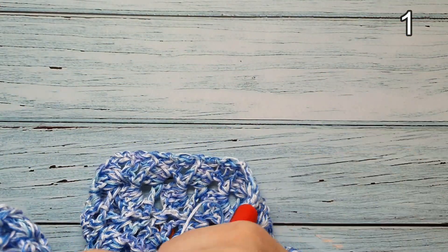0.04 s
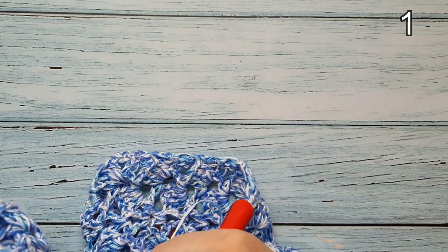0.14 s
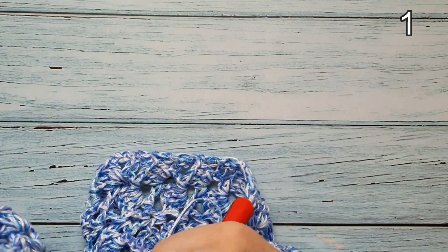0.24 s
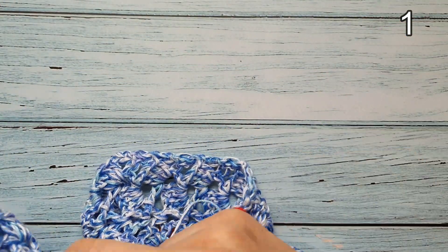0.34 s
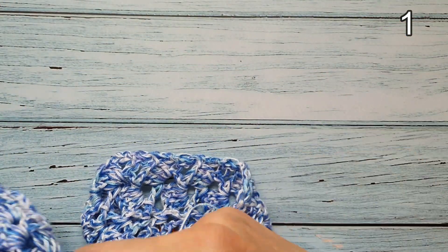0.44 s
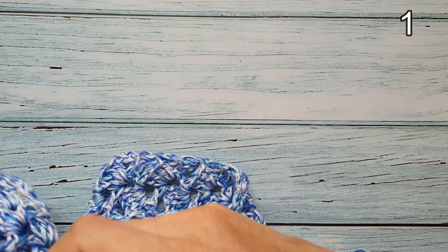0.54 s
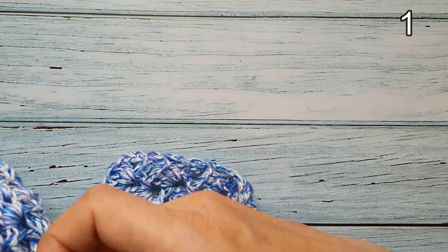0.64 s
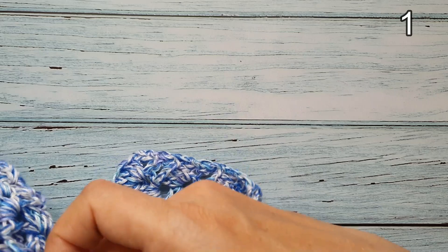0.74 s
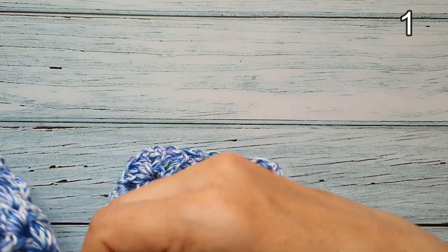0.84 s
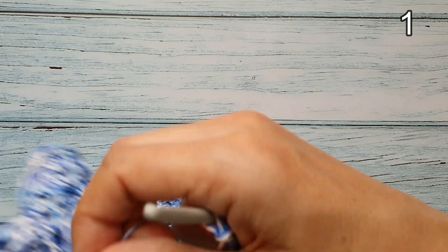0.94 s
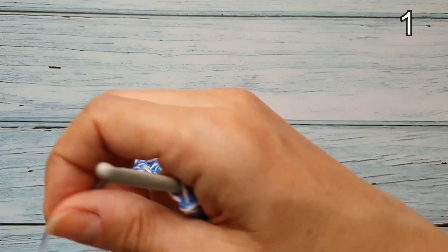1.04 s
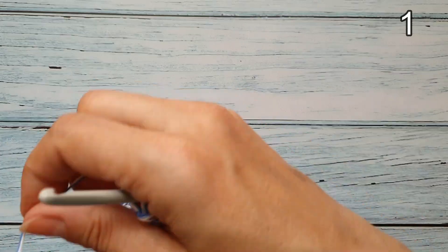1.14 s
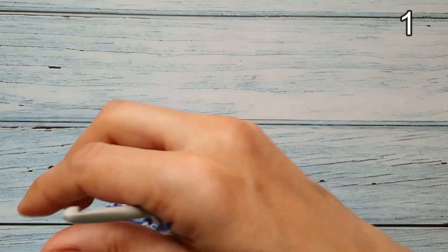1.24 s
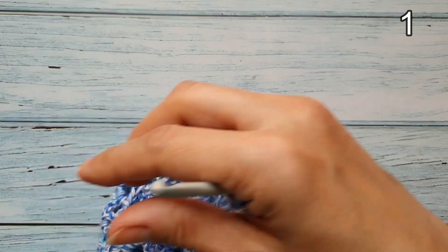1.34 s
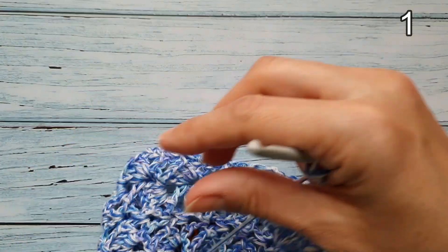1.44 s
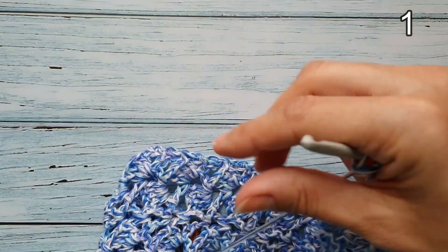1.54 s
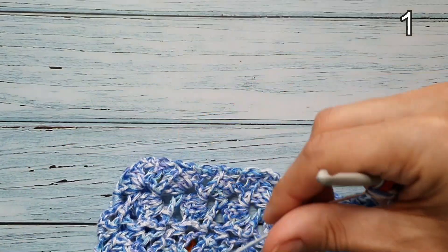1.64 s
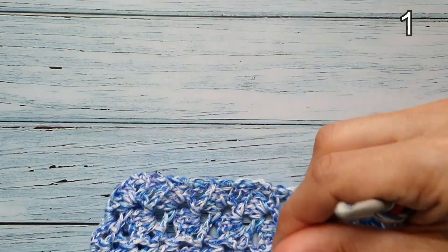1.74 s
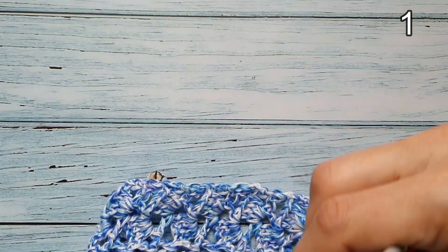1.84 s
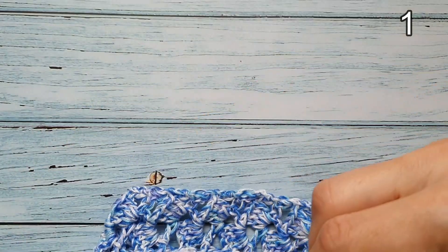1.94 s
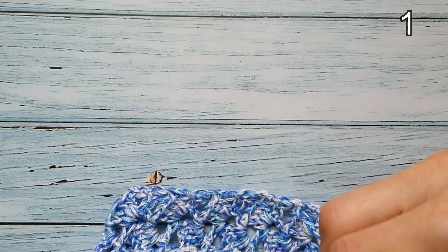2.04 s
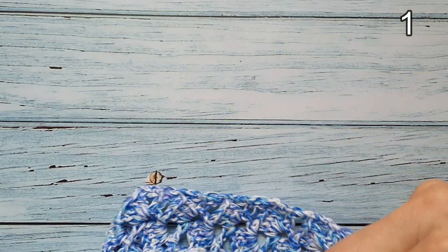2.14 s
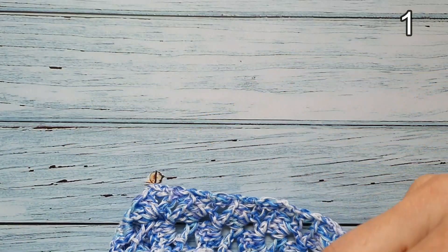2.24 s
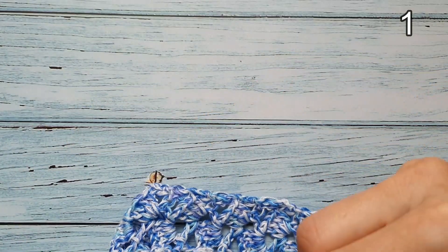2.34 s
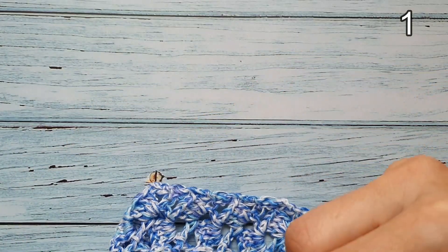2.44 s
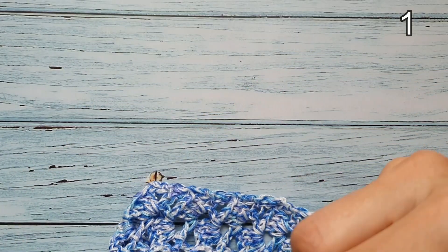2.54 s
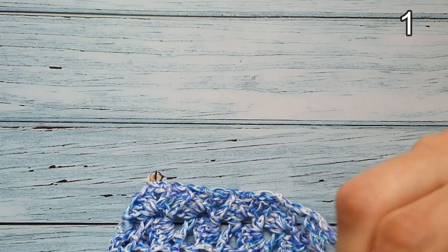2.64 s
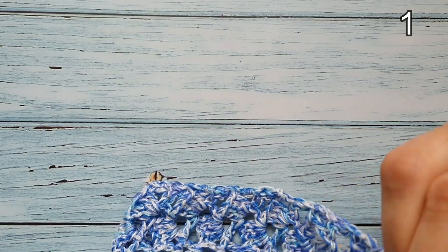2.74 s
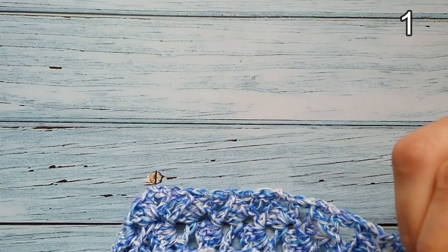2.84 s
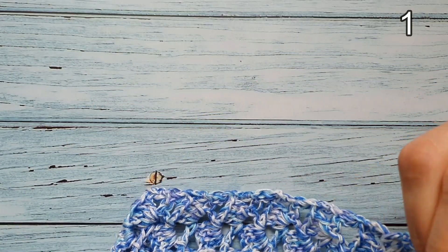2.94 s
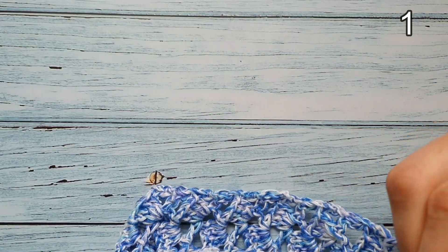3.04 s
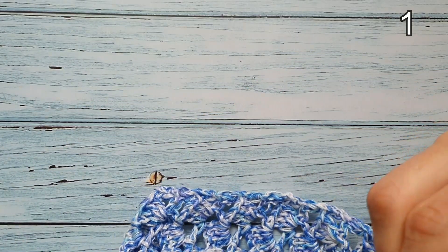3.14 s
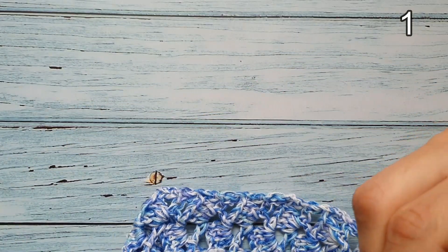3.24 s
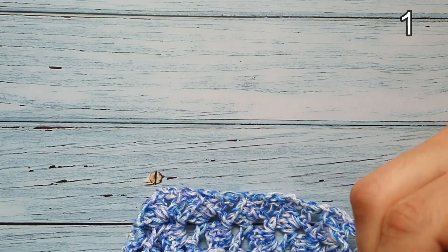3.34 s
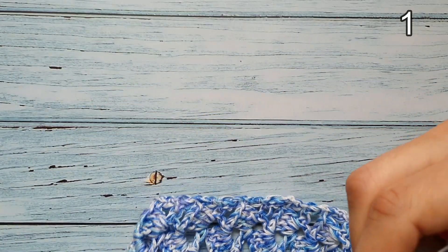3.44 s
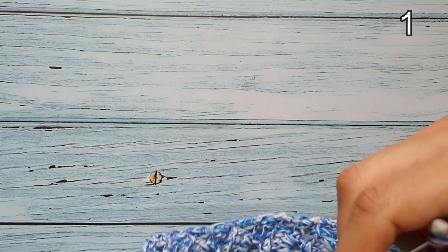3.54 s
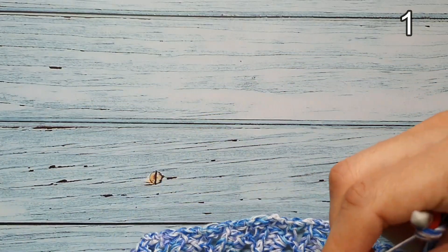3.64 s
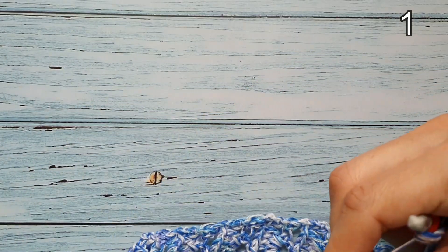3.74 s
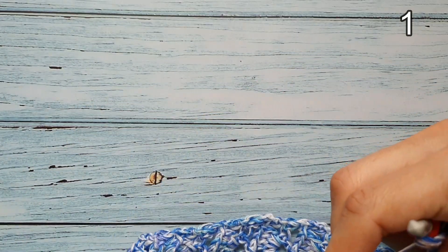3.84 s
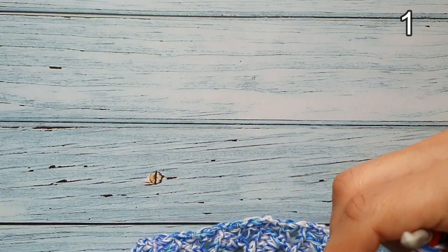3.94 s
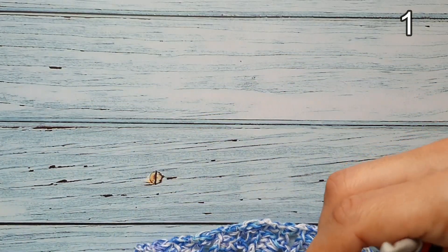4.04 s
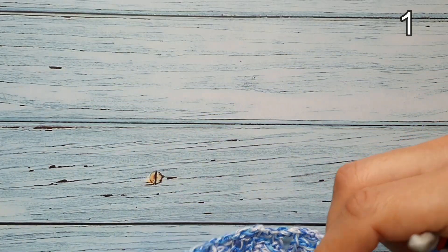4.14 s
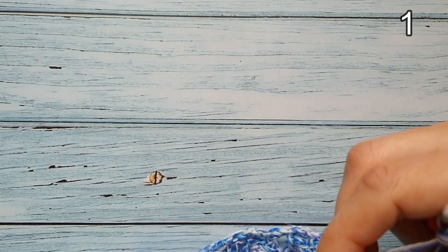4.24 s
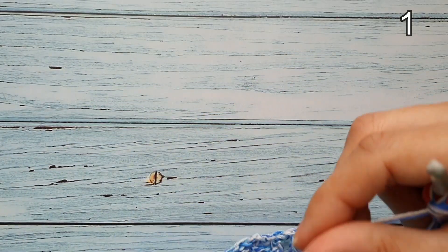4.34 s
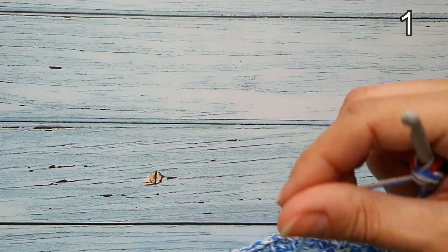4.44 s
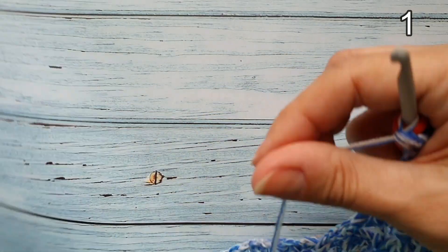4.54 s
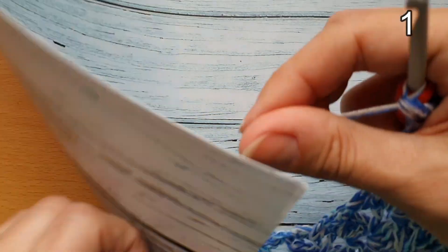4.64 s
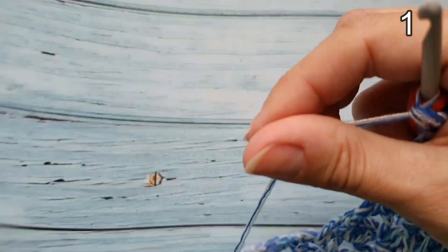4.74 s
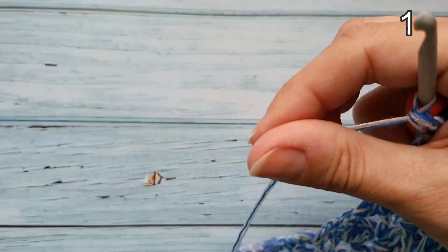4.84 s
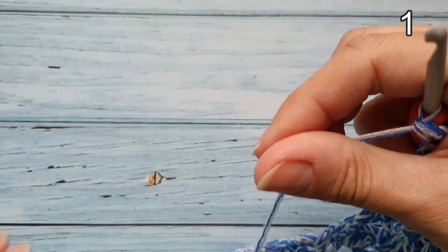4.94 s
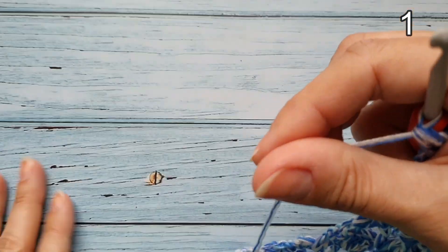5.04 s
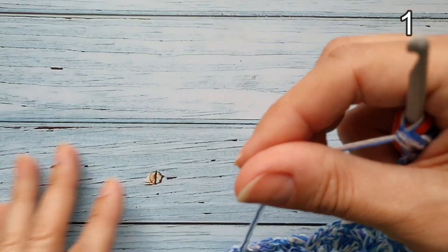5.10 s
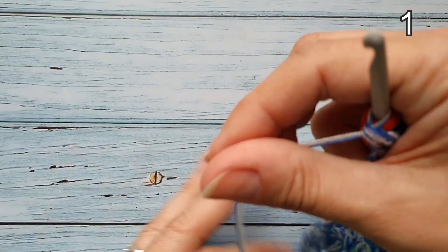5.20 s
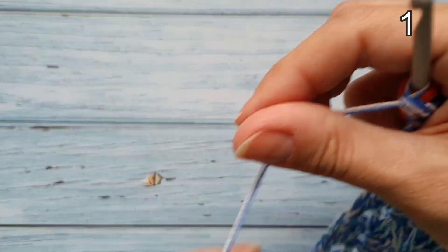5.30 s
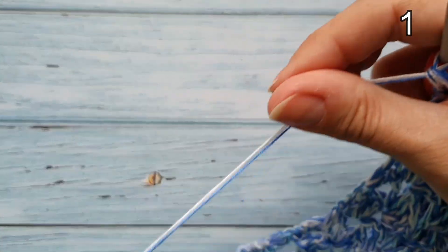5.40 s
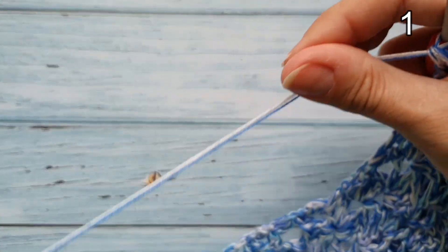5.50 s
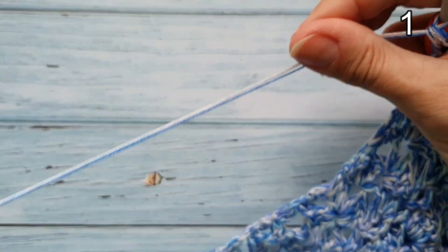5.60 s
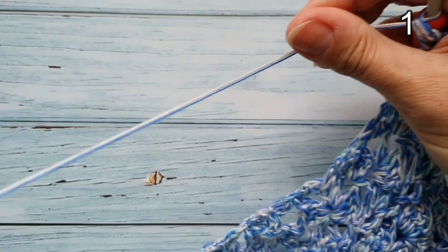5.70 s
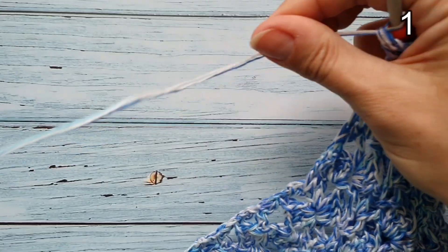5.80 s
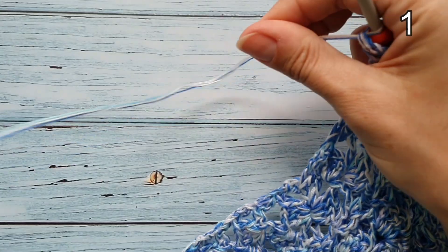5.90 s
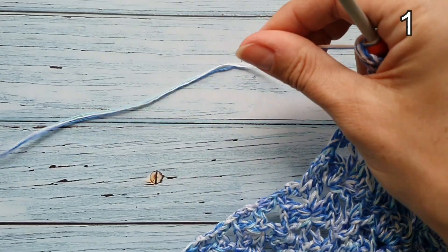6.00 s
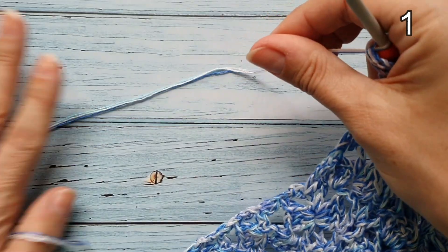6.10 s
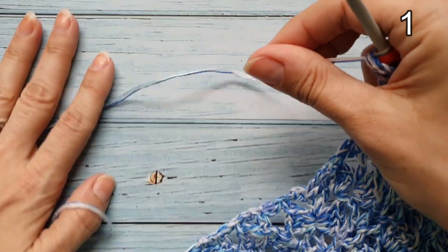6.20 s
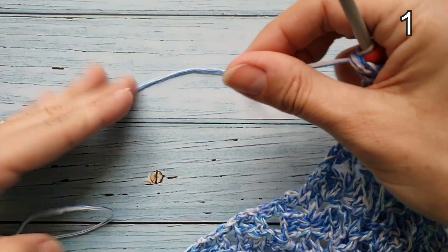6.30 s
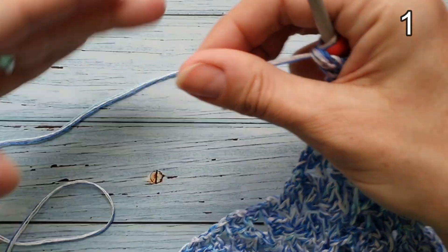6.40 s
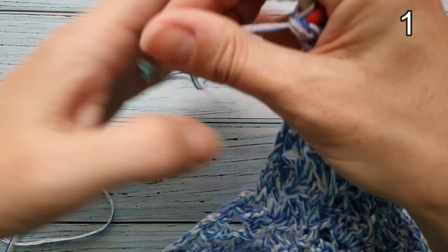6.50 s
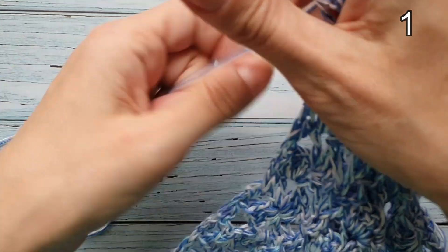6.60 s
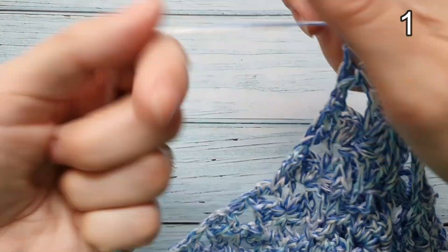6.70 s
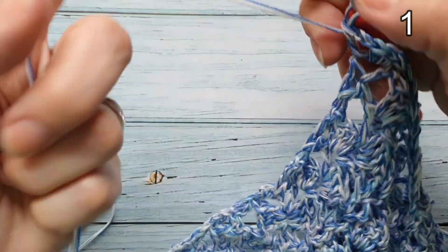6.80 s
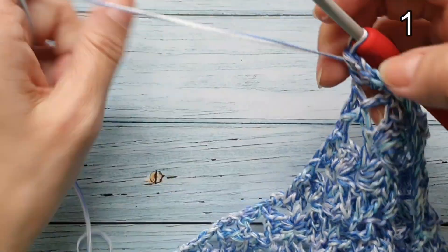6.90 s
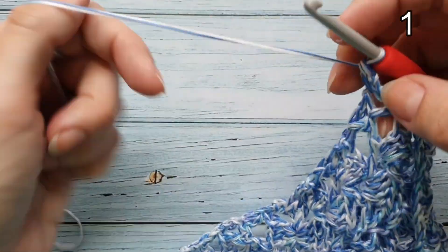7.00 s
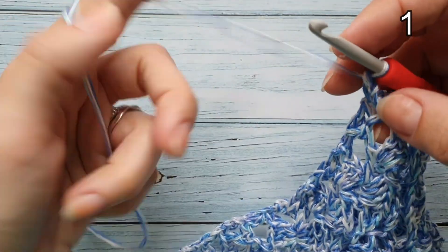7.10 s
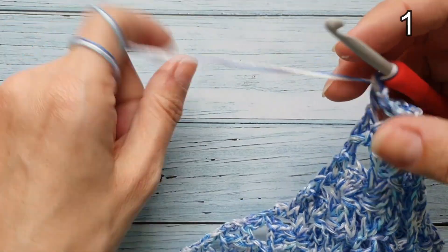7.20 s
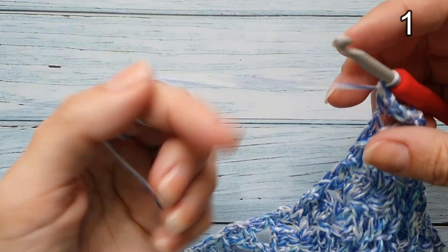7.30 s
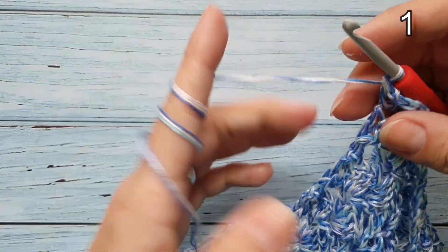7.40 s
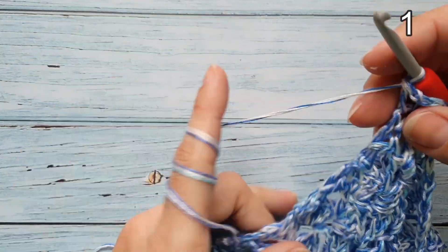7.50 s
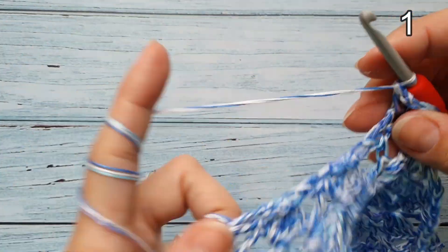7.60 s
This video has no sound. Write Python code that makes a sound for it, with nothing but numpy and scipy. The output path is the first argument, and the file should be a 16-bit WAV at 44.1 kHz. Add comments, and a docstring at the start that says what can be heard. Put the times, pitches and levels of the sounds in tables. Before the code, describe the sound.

Hands handle crochet on a wooden board, heard close in a quiet room with a faint low rumble. The first second holds only a slight rustle and a couple of tiny ticks. From about 1.4 to 2.2 seconds the cloth rubs softly over the wood, with light taps and dull thuds. After a lull, the rubbing and tapping return around 3 seconds and grow busier from 4.6. At 5 seconds comes a hollow clunk with a small bright clink, then a cluster of ticks and a low thump at 5.3. Yarn is drawn out with a faint hiss from 5.4 to 6.3 seconds. At 6.4 one sharp knock on the board, by far the loudest sound, rings briefly and leaves a faint after-ring. From 6.8 to 7.6 seconds yarn is wound round a finger in about five soft swishes, ending with a tiny tap.

```python
"""Soft rubbing and light taps are heard first: hands shift crochet over a wooden board in a quiet room.
Stick-slip friction of cotton and skin makes the rustle; fingers and hook excite the wood by impact.
Something small clinks, yarn hisses as it is drawn out, and one sharp knock, the loudest sound, sets
the board's modes ringing and leaves a faint after-ring. Last, yarn is wound round a finger."""
import sys
import numpy as np
from scipy import signal
from scipy.fft import rfft, irfft
from scipy.io import wavfile
from scipy.ndimage import uniform_filter1d

SR = 44100
rng = np.random.default_rng(int(sys.argv[2]) if len(sys.argv) > 2 else 0)


def output_pcm(signal):
    """Save a mono or channel-first signal as 16-bit PCM at the path in sys.argv[1].

    Samples are clipped to [-1, 1] before scaling.
    """
    pcm = np.clip(np.atleast_2d(signal).T, -1, 1) * 32767
    wavfile.write(sys.argv[1], SR, np.round(pcm).astype(np.int16))


N = 337629
TIME = np.arange(N) / SR
AGE = TIME[:SR]  # seconds since a blow

def undb(db):
    """Decibels are logarithmic: 20 dB is a tenfold amplitude."""
    return 10 ** (np.asarray(db) / 20)

def unit(x, span_s=None):
    """Normalisation to rms 1, over the whole signal or its first span_s."""
    return x / np.sqrt(np.mean((x if span_s is None else x[:int(span_s * SR)]) ** 2))

def add(out, start_s, x):
    """Superposition: a sound adds to the mix from start_s on."""
    i = int(start_s * SR)
    out[i:i + len(x)] += x[:N - i]

def fade(t60_s):
    """Damping: exponential decay by 60 dB in t60_s."""
    return np.exp(-np.log(1000) * AGE / t60_s)

def colour(x, spectrum):
    """Minimum-phase filtering through (frequency_hz, gain_db) points, by folding the cepstrum."""
    size = 4096
    hz, db = np.transpose(spectrum)
    bins_hz = np.maximum(np.arange(size // 2 + 1), .5) * SR / size
    gain = undb(np.interp(np.log(bins_hz), np.log(hz), db))
    cepstrum = irfft(np.log(gain))
    cepstrum[1:size // 2] *= 2
    cepstrum[size // 2 + 1:] = 0
    impulse_response = irfft(np.exp(rfft(cepstrum)))
    return signal.fftconvolve(x, impulse_response)[:len(x)]

def band(x, hz, ratio, order=2):
    """Band-pass filtering from hz / ratio to hz * ratio."""
    ratio = max(ratio, 1.05)
    edges_hz = [hz / ratio, min(hz * ratio, .45 * SR)]
    return signal.sosfilt(signal.butter(order, edges_hz, "band", fs=SR, output="sos"), x)

def walk(rate_hz):
    """Random modulation: a smooth wander of rms 1."""
    hold = int(SR / rate_hz)
    steps = np.repeat(rng.standard_normal(N // hold + 1), hold)
    return unit(uniform_filter1d(steps, hold)[:N])

def stroke(time, start_s, length_s, rise_s):
    """Speed envelope of a hand: it builds, sags and dies away; a gentle start gives a gentle end."""
    age = np.maximum(time - start_s, 0)
    build = np.sin(np.pi / 2 * np.minimum(age / rise_s, 1)) ** 2
    sag = undb(-2.5 * np.minimum(age / length_s, 1))
    release_s = .015 + .37 * rise_s
    return build * sag * np.exp(-np.maximum(age - length_s, 0) / release_s)

def gains(strokes):
    """Incoherent summation: overlapping strokes add in power, giving one gain curve per level column."""
    time = TIME[::40]
    speeds = np.array([stroke(time, *row[:3]) for row in strokes])
    strengths = undb([row[3:] for row in strokes])
    return [np.interp(TIME, time, np.sqrt(power)) for power in strengths.T ** 2 @ speeds ** 2]

def ring(modes):
    """Free vibration: damped sinusoids, each starting from zero with either sign."""
    return sum(rng.choice([-1, 1]) * undb(db) * fade(t60_s) * np.sin(2 * np.pi * hz * AGE)
               for hz, db, t60_s in modes)

def blow(click, crack_t60_s, tail_db, tail_t60_s):
    """Impact excitation: a contact pulse, a short crack and a noise tail of many close modes."""
    x = rng.standard_normal(SR) * (fade(crack_t60_s) + undb(tail_db) * fade(tail_t60_s))
    x[0] += click
    return x

def fibres(rate_hz, spread_db, patchy_db):
    """Stick-slip: fibres catch and release in dense tiny clicks; stitches pass in uneven patches."""
    releases = rng.random(N) < rate_hz / SR
    slips = releases * rng.standard_normal(N) * undb(spread_db * rng.standard_normal(N))
    return slips * undb(patchy_db * walk(55))

# Spectrum of the room's steady noise: frequency_hz, gain_db
ROOM_SPECTRUM = [(15, -32), (25, -7.5), (53, -1), (144, -14.5), (178, -12), (204, -18.5), (340, -22.5),
                 (520, -29.5), (760, -28), (1140, -37), (1660, -36), (2120, -40), (2560, -41.5),
                 (5010, -37), (5580, -30.5), (15500, -39.5)]
def room(direct):
    """Reverberation: a small furnished room adds faint diffuse reflections to its rumble and hiss."""
    reflections = rng.standard_normal(SR) * fade(t60_s=.22) * (AGE > .004)
    reverb = signal.fftconvolve(direct, reflections / np.linalg.norm(reflections))[:N]
    ambience = unit(colour(rng.standard_normal(N), ROOM_SPECTRUM)) * undb(.69 * walk(4))
    return direct + undb(-11) * reverb + undb(-63) * ambience

# Light rubs of skin on the board: start_s, length_s, rise_s, level_db
HOLLOW_RUBS = [(2.2, 1.45, .9, -75), (4.0, .4, .1, -72), (5.9, .45, .2, -71), (7.0, .55, .12, -74)]
def hollow_rubs():
    """Forced resonance: gliding skin keeps the board's hollow tone faintly sounding."""
    return gains(HOLLOW_RUBS)[0] * unit(band(rng.standard_normal(N), hz=810, ratio=1.09))

def yarn_squeak():
    """Narrow-band friction: a slack strand slips with an uneven squeak that falls as it slows."""
    start_s, length_s, rise_s, level_db = 6.07, .22, .1, -71
    glide_hz = np.interp(TIME, [start_s, start_s + length_s], [3500, 2000])
    pitch_hz = glide_hz * (1 + .036 * walk(25))
    lowpass = signal.butter(2, 230, fs=SR, output="sos")  # its cutoff is the squeak's half width
    grain = signal.sosfilt(lowpass, rng.standard_normal(N)) * undb(3 * walk(50))
    squeak = unit(grain * np.sin(2 * np.pi * np.cumsum(pitch_hz) / SR))
    return gains([(start_s, length_s, rise_s, level_db)])[0] * squeak

# Spectrum of slipping cotton fibres: frequency_hz, gain_db
FIBRE_SPECTRUM = [(800, -18), (1700, -10), (2500, -6), (3300, -6.5), (5000, -0.5), (6700, 1.5),
                  (9000, -4.5), (12000, -13.5), (16000, -22.5)]
def fibre_hiss(rate_hz, spread_db, patchy_db):
    """Shot noise: thousands of tiny slips a second merge into a bright hiss."""
    return unit(colour(fibres(rate_hz, spread_db, patchy_db), FIBRE_SPECTRUM))

# Spectrum of rubbed wood and hands: frequency_hz, gain_db
RUSTLE_SPECTRUM = [(40, -6.5), (75, 9.5), (120, 6.5), (220, 2.5), (400, -1), (620, -3.5), (830, -1.5),
                   (1100, -12.5), (2000, -17), (5000, -37.5)]
def rustle(friction):
    """Forced vibration: a rubbed body responds mostly at low frequencies."""
    return unit(colour(friction, RUSTLE_SPECTRUM))

# Yarn pulled through the fingers: start_s, length_s, rise_s, hiss_db, rub_db
YARN_PULLS = [(5.34, 0.22, .08, -78, -62.5), (5.56, .36, .16, -64.5, -68.5), (5.97, 0.34, .25, -76, -60),
              (6.45, .16, .04, -77.5, -56.5), (6.6, .18, 0.062, -75, -61.5)]
# Yarn wound round a finger: start_s, length_s, rise_s, hiss_db, rub_db, sway_db
YARN_TURNS = [(6.76, 0.15, 0.1, -66.5, -67.5, -46.5), (6.97, .16, 0.049, -68.5, -69, -46.5),
              (7.165, .11, 0.045, -70.5, -66, -52), (7.28, .11, .05, -71, -66, -54),
              (7.45, .125, 0.041, -69, -71, -58)]
def yarn():
    """Sliding friction: the strand hisses, the hands rub dully, and each turn sways the board."""
    pull_hiss, pull_rub = gains(YARN_PULLS)
    turn_hiss, turn_rub, turn_sway = gains(YARN_TURNS)
    strand = (pull_hiss + turn_hiss) * fibre_hiss(rate_hz=7900, spread_db=0, patchy_db=2)
    hands = (pull_rub + turn_rub) * rustle(rng.standard_normal(N))
    sway_hz = 65 * (1 + .02 * walk(3))
    sway = turn_sway * unit(np.sin(2 * np.pi * np.cumsum(sway_hz) / SR))
    return strand + undb(1.5) * hands + undb(-.5) * sway

# Brushes of cloth on wood: middle_s, half_length_s, level_db, centre_hz, half_width_ratio
BRUSHES = [(1.438, 0.024, -66, 9000, 1.15), (1.52, 0.05, -60, 1520, 1.18), (1.79, 0.13, -61, 4000, 1.05),
           (1.78, .14, -61.5, 3400, 1.05), (3.256, 0.019, -59.5, 4500, 1.3),
           (3.835, 0.064, -58.5, 4300, 1.24), (4.005, .012, -58, 5600, 1.25),
           (4.732, 0.012, -52, 4800, 1.27), (4.855, 0.022, -54, 7540, 1.29),
           (4.94, 0.012, -46.5, 6460, 1.32), (5.312, .011, -44, 2500, 1.2),
           (5.425, 0.019, -63.5, 8100, 1.46), (5.734, 0.095, -73.5, 2470, 1.1),
           (6.51, 0.033, -52.5, 6800, 1.65), (6.893, 0.028, -69.5, 3900, 1.12),
           (7.047, .025, -69.5, 5600, 1.2)]
def brushes():
    """Band-limited friction noise: fast slipping fibres swell and fade in short Gaussian envelopes."""
    slips = fibres(rate_hz=9000, spread_db=1, patchy_db=3)
    return sum(undb(db) * np.exp(-((TIME - middle_s) / half_s) ** 2 / 2) * unit(band(slips, hz, ratio))
               for middle_s, half_s, db, hz, ratio in BRUSHES)

# Spectrum of cotton rubbing on wood grain: frequency_hz, gain_db
FRICTION_SPECTRUM = [(500, -22), (1000, 8.5), (1600, 4), (2800, 3), (4100, 3), (5000, -0.5), (6100, 0.5),
                     (7000, -16), (12000, -38)]
# Pushes of the crochet: start_s, length_s, rise_s, friction_db, rustle_db, hiss_db
CROCHET_PUSHES = [(0., .18, .02, -77, -64, -80), (.58, .15, .1, -92, -89, -81),
                  (1.0, 0.26, 0.2, -65.5, -68.5, -68.5), (1.385, .19, 0.029, -52, -58, -71.5),
                  (1.56, 0.35, 0.097, -56, -57, -68), (1.86, .32, .1, -60.5, -59.5, -69),
                  (2.17, 0.19, .08, -74, -69.5, -83), (2.6, 0.25, 0.23, -81, -68, -82),
                  (2.88, 0.14, 0.11, -64, -58.5, -75), (3.02, .17, .1, -70.5, -62, -84),
                  (3.195, 0.081, 0.022, -60.5, -57, -69.5), (3.27, 0.44, 0.045, -95, -69.5, -88),
                  (3.69, .2, 0.088, -57.5, -56, -67.5), (3.9, 0.1, 0.088, -57.5, -53.5, -67.5),
                  (4.02, 0.35, 0.11, -84, -65, -76), (4.345, .16, 0.032, -64.5, -59, -69.5),
                  (4.5, .18, 0.069, -58, -59, -67), (4.69, .06, .055, -49, -54, -63),
                  (4.77, 0.13, 0.041, -52, -58, -56), (4.9, 0.057, 0.034, -47, -55, -51.5),
                  (4.98, 0.063, .03, -61, -42, -81), (5.085, 0.045, .02, -61, -54, -73),
                  (5.27, .065, .02, -49, -52, -62)]
def sliding_crochet():
    """Stick-slip friction: cloth rubs on the grain, and the same slips drive the board's low rustle."""
    friction_gain, rustle_gain, hiss_gain = gains(CROCHET_PUSHES)
    slips = fibres(rate_hz=9000, spread_db=.5, patchy_db=1.23)
    friction = friction_gain * unit(colour(slips, FRICTION_SPECTRUM))
    board = rustle_gain * rustle(slips)
    hiss = hiss_gain * fibre_hiss(rate_hz=9000, spread_db=3.5, patchy_db=3)
    return undb(-.5) * friction + undb(3) * (board + hiss)

# Lightly damped modes of something on the table: pitch_hz, gain_db, t60_s
AFTER_RING_MODES = [(221, -3.5, 1.2), (588, -8.5, 1.3), (593.2, 0.5, 1.08), (2574, -13.5, 0.9),
                    (2605, -13, 1.25), (2650, -16.5, .9), (2742, -18.5, 1.0), (2940, -15, .85)]
# Jolts that set it ringing: start_s, level_db
JOLTS = [(5.286, -63), (6.398, -45)]
def after_ring():
    """Beating: close modes interfere after the heavy blows, and their level wavers at random."""
    out = np.zeros(N)
    for start_s, level_db in JOLTS:
        add(out, start_s, undb(level_db) * unit(ring(AFTER_RING_MODES), span_s=.054))
    return out * undb(2.2 * walk(45))

# Low thuds and short dull tones in the board: start_s, level_db, pitch_hz
THUDS = [(.926, -57, 66), (1.391, -35.5, 72.4), (1.441, -39.5, 78.3), (1.62, -45.5, 58.3),
         (2.145, -47.5, 70.7), (3.197, -47, 90), (3.21, -51, 215), (3.3, -60, 398), (3.8, -45, 70),
         (3.875, -49, 85), (3.951, -47, 107), (3.996, -40, 71), (4.38, -42.5, 93.6), (4.432, -43.5, 60),
         (4.611, -52.5, 74), (4.812, -41.5, 69), (4.891, -50, 169), (5.039, -42.5, 90), (5.286, -31, 97.4),
         (5.29, -36, 49.6), (5.49, -45.5, 58.7), (6.191, -51, 61), (6.39, -33, 56.6), (6.579, -45.5, 55.4),
         (7.638, -52, 91)]
def thuds():
    """Soft excitation: a slow push swings only the board's low bending modes."""
    out = np.zeros(N)
    for start_s, level_db, pitch_hz in THUDS:
        modes = [(pitch_hz, 0, .13), (pitch_hz * 1.5, -7, .12), (pitch_hz * 2.4, -15, .1)]
        swing = ring(modes) * (1 - fade(.03))
        add(out, start_s, undb(level_db) * unit(swing, span_s=.054))
    return out

# Spectrum of lightly struck wood: frequency_hz, gain_db
WOOD_SPECTRUM = [(60, -11.5), (200, 2.5), (450, 2), (800, 1.5), (1200, -5), (2000, -3.5), (2800, -27),
                 (8000, -50)]
# Fingers and hook touching the board: start_s, wood_db, tick_db, tick_centre_hz
TAPS = [(0.033, -58, -56, 5400), (0.927, -65.5, -59.5, 7460), (1.387, -46, -49, 5950),
        (1.622, -49, -52, 2600), (1.688, -56, -54.5, 5400), (2.141, -49, -51.5, 2950),
        (2.173, -52, -55, 3000), (3.195, -50.5, -43.5, 4300), (3.548, -70, -66, 800),
        (3.655, -68, -68, 1100), (3.704, -53.5, -57, 4430), (3.737, -62, -60, 1400),
        (3.789, -58, -58, 1200), (4.006, -48, -42, 780), (4.083, -68, -62, 900), (4.375, -50, -57, 2600),
        (4.382, -53, -54.5, 3200), (4.471, -59.5, -50.5, 5900), (4.628, -49.5, -55, 2200),
        (4.657, -62, -43, 4660), (4.806, -44, -42, 1850), (4.821, -40, -38, 2000), (4.86, -46, -50, 2200),
        (4.995, -46, -39.5, 2800), (5.055, -36, -44, 1750), (5.097, -43, -33, 3900),
        (5.118, -40, -36, 2870), (5.27, -45, -34.5, 2700), (5.282, -36.5, -32.5, 4330),
        (5.286, -41.5, -34, 2900), (5.302, -39.5, -38, 6060), (5.466, -62, -63, 3800),
        (5.507, -46.5, -51.5, 2400), (6.227, -70, -58, 2700), (6.384, -39, -31.5, 3250),
        (6.413, -24.5, -31.5, 5940), (7.638, -61, -62, 3920)]
def taps():
    """Impulse response: each touch gives a bright contact tick and a duller, hollow tone in the wood."""
    out = np.zeros(N)
    for start_s, wood_db, tick_db, tick_hz in TAPS:
        wood = colour(blow(click=8.4, crack_t60_s=.039, tail_db=-13.5, tail_t60_s=.23), WOOD_SPECTRUM)
        hollow = ring([(760, 0, .05)])
        body = unit(wood, span_s=.01) + undb(-7) * unit(hollow, span_s=.01)
        contact = blow(click=4.2, crack_t60_s=.014, tail_db=-12, tail_t60_s=.12)
        tick = band(contact, tick_hz, ratio=1.423) + undb(-15.5) * band(contact, hz=4500, ratio=1.8)
        add(out, start_s, undb(wood_db) * body + undb(tick_db - 2) * unit(tick, span_s=.0059))
    return out

# Resonances of a hollow object: centre_hz, nominal_width_hz, gain_db
CLUNK_MODES = [(440, 100, 1.5), (650, 60, 0), (830, 60, -6), (1180, 170, -7), (1680, 360, -12)]
def clunk():
    """Noise-driven resonance: something hollow is nudged and judders briefly through its low modes."""
    peak_s, rise_s, fall_s, level_db = 5.032, .003, .019, -27
    judder = rng.standard_normal(N)
    body = sum(undb(db) * band(judder, hz, 1 + width_hz / hz / 2, order=1)
               for hz, width_hz, db in CLUNK_MODES)
    push = np.exp(-np.maximum((peak_s - TIME) / rise_s, (TIME - peak_s) / fall_s))
    scrape = band(body, hz=680, ratio=2.43) * push
    return undb(level_db) * scrape / np.std(scrape[push > .5])

# Modes of a small hard object: pitch_hz, gain_db, t60_s
CLINK_MODES = [(5200, -16, .06), (6950, 2, 0.067), (6960, -6, 0.09), (7320, -2, 0.074), (8382, -8, 0.09),
               (8600, -6, .1), (11060, -18, .06)]
# Strikes on it: start_s, level_db
CLINKS = [(5.0476, -30.5), (5.079, -46)]
def clinks():
    """Hard impact: a very short contact excites the thin, high modes of a small object."""
    out = np.zeros(N)
    for start_s, level_db in CLINKS:
        contact = blow(click=3.5, crack_t60_s=.0081, tail_db=-32, tail_t60_s=.08)
        strike = band(contact, hz=7380, ratio=1.135) + undb(-16) * band(contact, hz=6200, ratio=1.7)
        ringing = unit(ring(CLINK_MODES), span_s=.012)
        clink = undb(1) * unit(strike, span_s=.0057) + undb(-7) * ringing
        add(out, start_s, undb(level_db) * clink)
    return out

# Spectrum of the knock's crack: frequency_hz, gain_db
KNOCK_SPECTRUM = [(60, -11.5), (200, 1), (300, -5), (600, 0), (900, -0.5), (1200, -6.5), (1700, 0.5),
                  (2400, -3), (2900, -4.5), (3450, -1.5), (3850, -15), (5500, -15), (7300, -15),
                  (9500, -31.5), (15000, -45.5)]
# Modes of the board under a hard blow: pitch_hz, gain_db, t60_s
BOARD_MODES = [(49.9, -6.5, .5), (81.6, -7.5, 0.51), (108, -7, .4), (131.5, -8.5, 0.41), (195, -3, .25),
               (233.4, 5, .23), (377, -6, 0.25), (436, 1.5, 0.16), (549, 3, 0.17), (580.4, -2, 0.25),
               (671, -2.5, 0.18), (956, -2, 0.18), (1286, -11, .14), (1450, -4, .16), (1640, 1, .16),
               (1747, -6.5, 0.22), (1810, 0, .14), (1905, -2.5, .16), (2090, -1.5, 0.22), (2310, -2, 0.22),
               (2540, -8, .14), (2630, -4, .17), (2850, -4, .14), (3080, -7, .12), (3340, -2.5, 0.08)]
def knock():
    """Broadband excitation: something hard in the hand cracks on the board, whose modes ring on."""
    start_s, crack_db, ring_db = 6.3968, -13, -19
    contact = blow(click=3, crack_t60_s=.017, tail_db=-14.5, tail_t60_s=.18)
    crack = unit(colour(contact, KNOCK_SPECTRUM), span_s=.011)
    ringing = unit(ring(BOARD_MODES), span_s=.011)
    out = np.zeros(N)
    add(out, start_s, undb(crack_db) * crack + undb(ring_db) * ringing)
    return out

def scene():
    """Mid-side stereo: all sources add in the centre; only a trace of hiss differs between the ears."""
    rubbing = sliding_crochet() + yarn() + yarn_squeak() + brushes()
    impacts = taps() + thuds() + clunk() + clinks() + knock()
    mid = room(rubbing + impacts + after_ring() + hollow_rubs())
    side = undb(-82.5) * unit(band(rng.standard_normal(N), hz=10000, ratio=1.53))
    return np.array([mid + side, mid - side])

def record(dry):
    """Band limiting: filters remove the deepest rumble and the highest treble."""
    bottom_hz, top_hz = 35, 15650
    highpass = signal.butter(3, bottom_hz, "high", fs=SR, output="sos")
    lowpass = signal.ellip(8, .2, 70, top_hz, fs=SR, output="sos")
    return signal.sosfilt(lowpass, signal.sosfilt(highpass, dry))

dry = scene()
out = record(dry)
output_pcm(out)
```